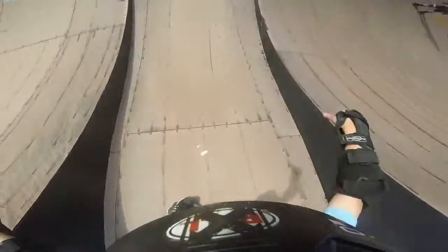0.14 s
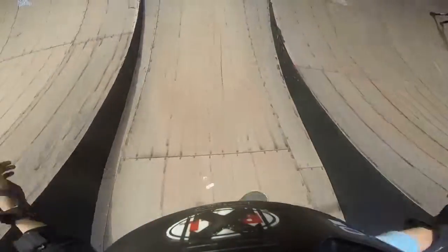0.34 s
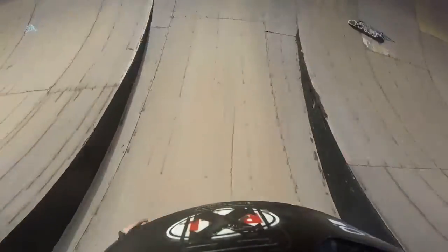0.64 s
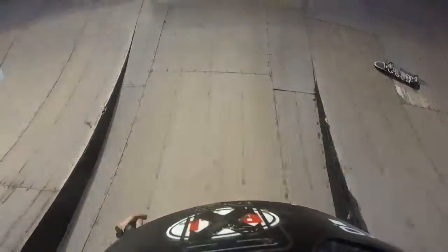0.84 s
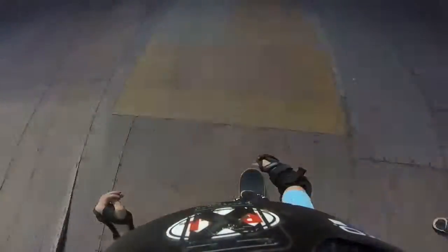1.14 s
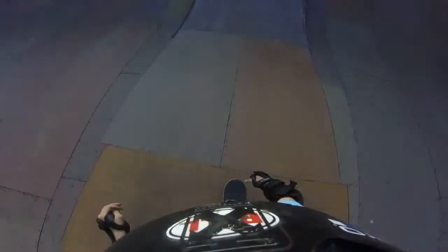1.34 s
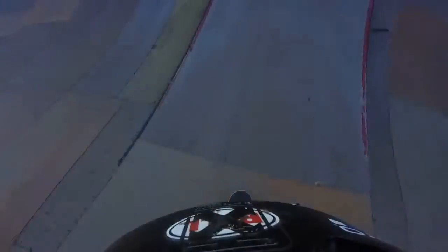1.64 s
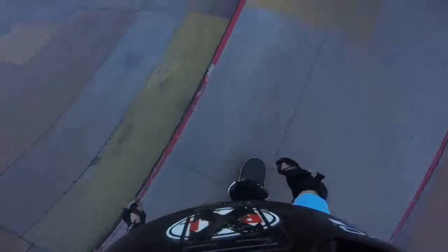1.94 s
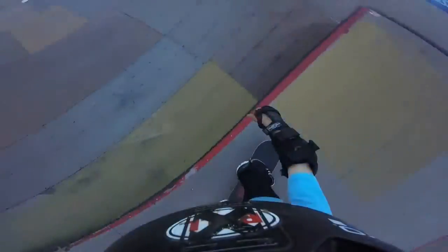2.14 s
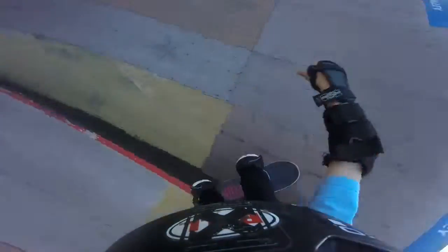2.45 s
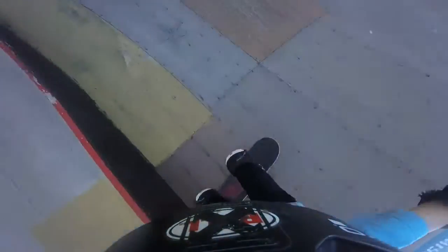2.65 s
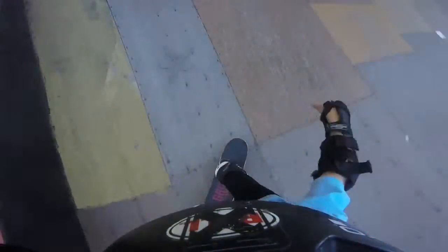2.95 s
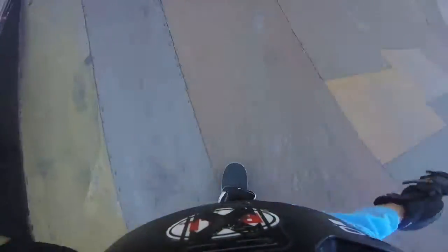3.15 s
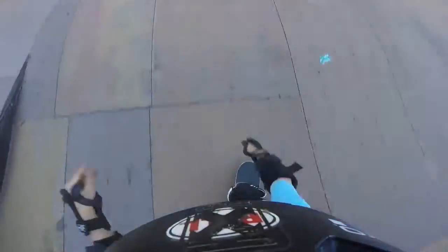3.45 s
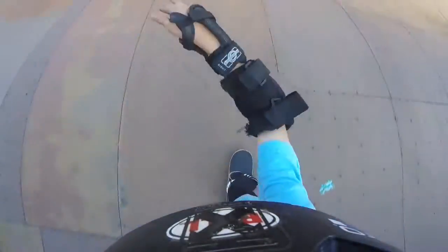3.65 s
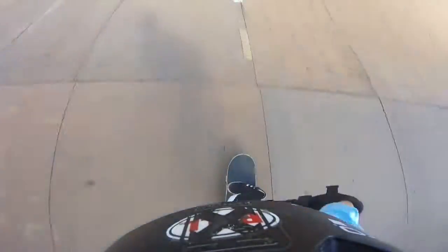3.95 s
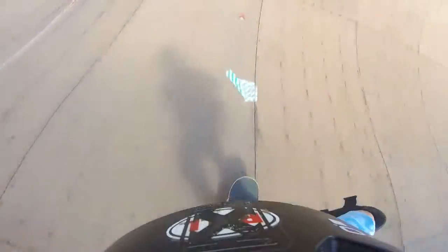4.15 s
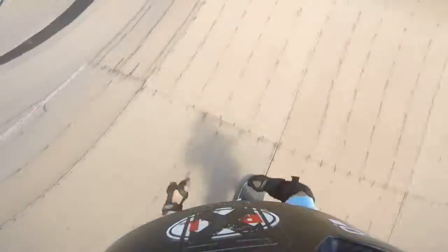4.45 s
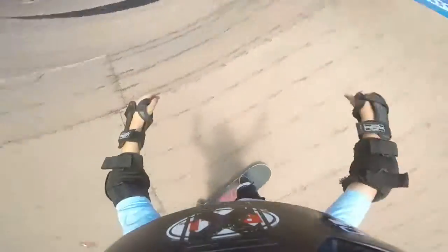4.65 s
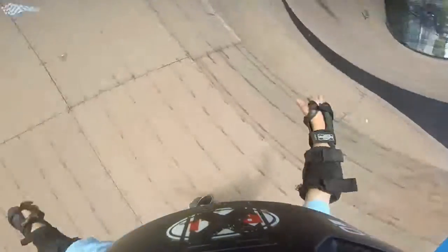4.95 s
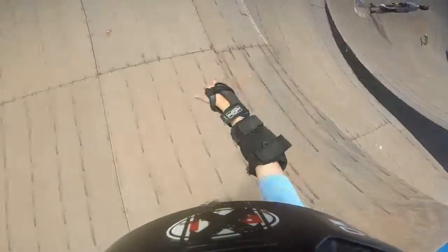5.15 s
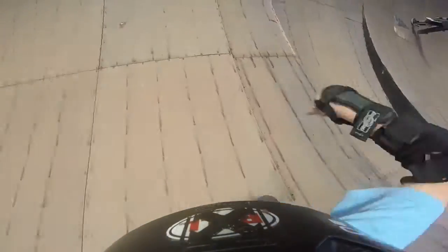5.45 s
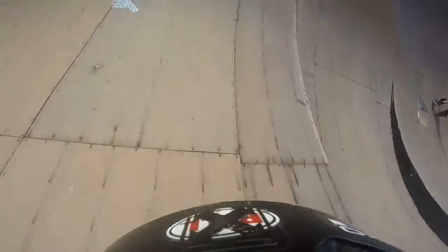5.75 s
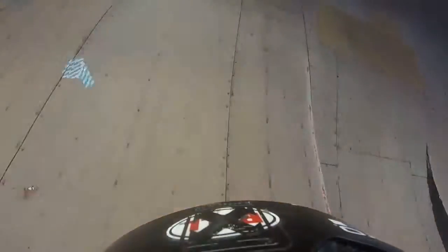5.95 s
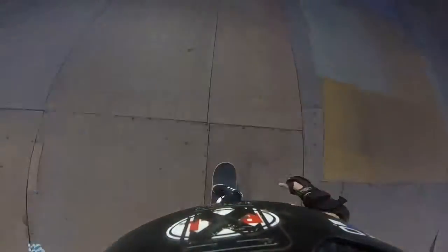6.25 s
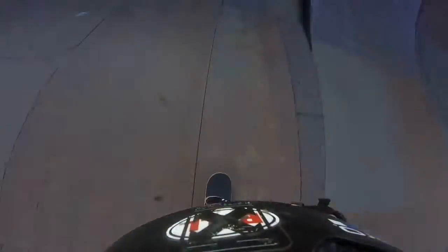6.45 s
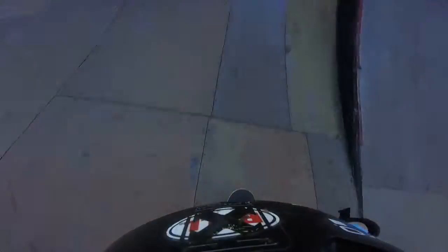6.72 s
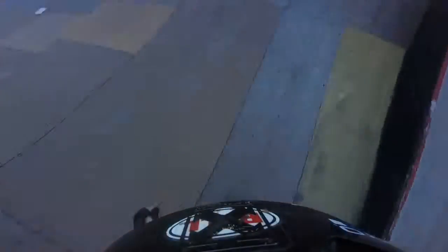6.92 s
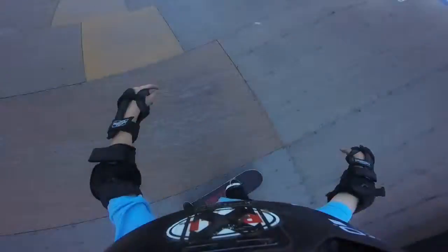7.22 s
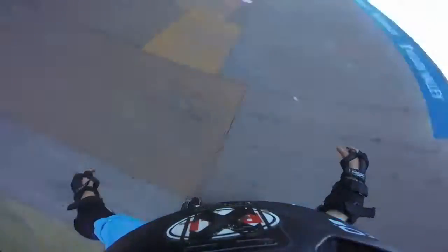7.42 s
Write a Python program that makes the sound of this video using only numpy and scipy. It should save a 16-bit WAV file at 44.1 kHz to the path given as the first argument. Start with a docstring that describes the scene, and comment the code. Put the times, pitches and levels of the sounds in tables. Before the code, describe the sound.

Skateboard wheels roll through a skatepark bowl with a hollow whir that swells and fades with speed. After a short chattering skid, the board clacks over seams, goes quieter in a brief jump and slams down with a thump and rattle. It rolls on with more clacks, eases off and builds again. The sound is close and slightly muffled, from a helmet microphone with low wind rumble.

```python
"""Skateboard wheels roar through a bowl: rough contact excites them, more loudly with speed and load.
They clack over seams, chatter in a stick-slip skid, spin free in a short air and slam down again.
The landing jolts the rider's helmet and air buffets it. All is heard from a closed plastic camera
case on the helmet, whose wall muffles the board and whose resonances ring with it."""
import sys
import numpy as np
from scipy import signal
from scipy.fft import rfft, irfft
from scipy.io import wavfile

SR = 44100
rng = np.random.default_rng(int(sys.argv[2]) if len(sys.argv) > 2 else 0)


def persist_wave(psi):
    """Save psi, clipped to +-1, as 16-bit WAV."""
    counts = np.round(np.clip(psi, -1, 1) * 32767).astype(np.int16)
    wavfile.write(sys.argv[1], SR, np.atleast_2d(counts).T)


N = 334278
T = np.arange(N) / SR
TAPS = 8192  # samples in one short sound and in a filter's transform
HZ = np.fft.rfftfreq(TAPS, 1 / SR)
CRUISE_TURNS_PER_S = 36
LIFT_S, LAND_S = 2.454, 2.946
# three carves, fast and heavy in the bowl, slow and light on its walls:
# (time [s], wheel speed [turns/s], load [0-1])
RIDE = [(0.0, 25.3, 0.5), (0.16, 12.2, 0.2), (0.44, 19.2, 0.12), (0.63, 26.7, 0.77), (1.14, 36.1, 0.98),
        (1.71, 32.8, 0.83), (1.94, 35.4, 0.98), (2.28, 32.8, 0.86), (2.77, 24.1, 0.14), (3.1, 29.2, 0.57),
        (3.49, 34.3, 0.95), (4.21, 39.3, 0.83), (4.68, 36, 0.86), (5.08, 24.4, 0.63), (5.21, 18.6, 0.32),
        (5.59, 19.3, 0.23), (5.76, 29.3, 0.6), (6.16, 32.9, 0.9), (6.51, 37.4, 0.78), (7.28, 34.3, 0.97),
        (7.58, 26.7, 0.69)]


def amp(db):
    """Amplitude ratio of a level in decibels."""
    return 10 ** (np.asarray(db) / 20)


def unit(x):
    """Normalisation to rms 1."""
    return x / np.sqrt(np.mean(x ** 2) + 1e-20)


def shape(points):
    """Spectral envelope in dB, interpolated over log frequency."""
    hz, db = np.transpose(points)
    return np.interp(np.log(HZ + 1), np.log(hz), db)


def bump(hz, width):
    """Gaussian band of height 1; width is taken at half height."""
    return .5 ** ((2 * (HZ - hz) / width) ** 2)


def resonance_db(hz, width):
    """Lorentzian peak of a single resonance."""
    return -20 * np.log10(1 + (2 * (HZ - hz) / width) ** 2)


def case_db():
    """Transmission through the case: its wall absorbs treble and its resonances lift narrow bands."""
    # transmission of the wall: (frequency [Hz], gain [dB])
    wall = [(30, -30.5), (200, -17), (900, -19), (1100, -20.5), (1850, -21), (2600, -21.5), (3300, -22.5),
            (3650, -31.5), (4400, -49), (7700, -50.5), (10000, -54.5), (15000, -77)]
    # resonances of the case: (frequency [Hz], width [Hz], lift [dB])
    case_modes = [(1389, 402, 21), (1154, 26, 5), (1266, 126, 4.5), (1383, 49, 4.5), (1544, 54, 7.5),
                  (1689, 45, 8), (2223, 470, 8.5), (3100, 560, 2.5), (4080, 390, 11.5), (5320, 390, 7),
                  (6490, 830, 9.5), (8350, 400, 5), (9260, 730, 7.5)]
    return shape(wall) + sum(db * bump(hz, width) for hz, width, db in case_modes)


def colour(x, db):
    """Minimum-phase filter: it is causal, so ringing follows the blow."""
    log_gain = np.log(amp(np.concatenate([db, db[-2:0:-1]])))
    response = np.fft.ifft(np.exp(signal.hilbert(log_gain).conj())).real
    return signal.fftconvolve(x, response[:TAPS // 2])[:len(x)]


def wobble(hz):
    """Random modulation: low-passed noise of rms 1."""
    f = np.fft.rfftfreq(N, 1 / SR)
    return unit(irfft(rfft(rng.standard_normal(N)) / (1 + (f / hz) ** 2), N))


def swell(t, peak_s):
    """Critically damped pulse that reaches 1 at peak_s."""
    return t / peak_s * np.exp(1 - t / peak_s)


def add(mix, s, sound):
    """Superposition of a sound starting at time s."""
    part = mix[round(s * SR):][:len(sound)]
    part += sound[:len(part)]


def speed(t):
    """Rotation rate of the wheels in turns per second."""
    s, turns, _ = np.transpose(RIDE)
    return np.maximum(np.interp(t, s, turns), 1)


def load(t):
    """Normal force of the rider's weight on the wheels, 0-1."""
    s, _, weight = np.transpose(RIDE)
    return np.clip(np.interp(t, s, weight), 0, 1)


def aloft(rise_s=.33, settle_s=.24):
    """Loss of contact: rises to 1 as the board leaves the lip and falls after the landing."""
    return np.clip(np.minimum(1 + (T - LIFT_S) / rise_s, 1 - (T - LAND_S) / settle_s), 0, 1)


def ride_gain(cruise_db, per_doubling_db, unloaded_db, aloft_db):
    """Power law of speed, with offsets in level as the weight comes off and the board flies."""
    doublings = np.log2(speed(T) / CRUISE_TURNS_PER_S)
    return amp(cruise_db + per_doubling_db * doublings + unloaded_db * (1 - load(T)) + aloft_db * aloft())


def tread(turns, size=1200):
    """Periodic excitation: the same worn tread meets the ground on every turn."""
    return np.interp(turns % 1, np.arange(size) / size, rng.standard_normal(size))


def reflection(x, delay_s, sweep_s, rate_hz, share):
    """Comb filtering: an echo with a changing path sweeps hollow bands through the sound."""
    return x + share * np.interp(T - delay_s - sweep_s * wobble(rate_hz), T, x)


def rolling(patchy_db=1.6, grain_db=3, grains_per_s=900, skitter_db=3, squash_turns_per_s=37.3):
    """Roughness excitation: uneven ground, loose grains and four treads shake the wheels and board."""
    # spectra of flattened wheels, light wheels, surface drone and grit: (frequency [Hz], level [dB])
    squashed_spectrum = [(200, -32.5), (700, -15), (1100, -1), (1300, -3), (1700, -5), (2000, -4),
                         (3000, -23), (8000, -47.5)]
    light_spectrum = [(200, -32), (900, -28.5), (1180, -13.5), (1380, -3.5), (1490, 0.5), (1580, -3),
                      (1750, 0.5), (2000, -10.5), (3000, -25.5), (8000, -40)]
    drone_spectrum = [(80, -9.5), (210, -12), (290, -12), (420, -2.5), (540, 1), (660, -1.5), (780, -11.5),
                      (1000, -14.5), (1300, -28.5), (3000, -51.5)]
    grit_spectrum = [(300, -19), (900, -2), (1400, -16.5), (1900, -5.5), (3200, -1.5), (4200, -1),
                     (5500, 0), (9300, -1.5), (15000, -10.5)]
    turns = np.cumsum(speed(T)) / SR
    ground = amp(patchy_db * wobble(hz=45.3))
    grains = rng.standard_normal(N) * amp(grain_db * np.minimum(rng.exponential(1, N), 4))
    grains *= rng.random(N) < grains_per_s / SR

    def voice(spectrum):
        """Source and filter: four slightly detuned wheels, echoed by the curved wall and the ground."""
        treads = unit(sum(tread(turns * (1 + .008 * slip)) for slip in rng.standard_normal(4)))
        contact = ground * (rng.standard_normal(N) + .31 * unit(grains) + .72 * treads)
        with_wall = reflection(contact, delay_s=.01, sweep_s=.0022, rate_hz=.842, share=.38)
        with_ground = reflection(with_wall, delay_s=.00239, sweep_s=.00035, rate_hz=1.18, share=.25)
        return unit(colour(with_ground, shape(spectrum) + case_db()))

    # a fast carve flattens the wheels and lowers their ring
    squash = np.minimum(speed(T) / squash_turns_per_s, 1) ** 5
    skitter = amp(skitter_db * (1 - load(T)) * wobble(hz=20))  # a light wheel keeps losing its grip
    wheels = np.sqrt(squash) * voice(squashed_spectrum)
    wheels += np.sqrt(1 - squash) * skitter * voice(light_spectrum)
    whirr = ride_gain(cruise_db=-35, per_doubling_db=17.5, unloaded_db=-1.2, aloft_db=-9)
    drone = ride_gain(cruise_db=-34, per_doubling_db=3, unloaded_db=-36.5, aloft_db=-3.5)
    grit = ride_gain(cruise_db=-43, per_doubling_db=20.5, unloaded_db=1, aloft_db=-.5)
    return whirr * wheels + drone * voice(drone_spectrum) + grit * voice(grit_spectrum)


def fizzing(flutter_db=.5):
    """Fine contact noise of the treads follows a steep power law of speed."""
    # fizz of the treads: (frequency [Hz], level [dB])
    fizz_spectrum = [(500, -41), (3000, -21.5), (5000, -8), (6500, 3), (9400, 5.5), (11000, -6),
                     (15000, -17)]
    contact = rng.standard_normal(N) * amp(flutter_db * wobble(hz=60))
    gain = ride_gain(cruise_db=-65.5, per_doubling_db=24, unloaded_db=-7.5, aloft_db=-1.5)
    return gain * unit(colour(contact, shape(fizz_spectrum) + case_db()))


def spinning(half_aloft_db=-48, lift_db=14, light_db=-55, loaded_db=-20, flutter_db=2):
    """Fluttering bearings excite the wheels' modes, faintly under a light board, clearly in the air."""
    # resonances of the free wheels and bearings: (frequency [Hz], width [Hz], level [dB])
    bearing_modes = [(1500, 280, -3), (1740, 240, 0), (2150, 250, -7), (2760, 330, 0), (3350, 200, -7),
                     (3830, 160, -7)]
    modes_db = 20 * np.log10(.03 + sum(amp(db) * bump(hz, width) for hz, width, db in bearing_modes))
    balls = rng.standard_normal(N) * amp(flutter_db * wobble(hz=40))
    free = aloft()
    in_air = (free > 0) * amp(half_aloft_db + lift_db * (free - .5))
    on_ground = amp(light_db + loaded_db * load(T))
    return np.maximum(in_air, on_ground) * unit(colour(balls, modes_db + case_db()))


def air(lumpy_db=3.5, hiss_db=-57):
    """Turbulence buffets the helmet, growing with speed and in gusts, over a quiet steady hiss."""
    # spectra of the buffeting and the background hiss: (frequency [Hz], level [dB])
    rumble_spectrum = [(10, -15.5), (25, 14.5), (45, -2), (70, -1), (100, 1.5), (140, -4), (185, -12.5),
                       (230, -12), (320, -20), (800, -63), (3000, -93)]
    hiss_spectrum = [(50, -2), (500, -5), (1000, -13), (1400, -14), (1900, -7.5), (3000, -15), (4400, -20),
                     (7000, -25.5), (10000, -32), (15000, -38.5)]
    # gusts at the helmet: (time [s], half length [s], lift [dB])
    gust_swells = [(1.92, 0.056, 5.5), (3.8, 0.071, 9), (4.6, 0.35, 4), (6.7, 0.93, 3.5)]
    buffeting = rng.standard_normal(N) * amp(lumpy_db * wobble(hz=28))
    lumps = unit(colour(buffeting, shape(rumble_spectrum)))
    hiss = unit(colour(rng.standard_normal(N), shape(hiss_spectrum)))
    gusts = amp(sum(db * np.exp(-((T - s) / half) ** 2) for s, half, db in gust_swells))
    gain = ride_gain(cruise_db=-34.5, per_doubling_db=8.5, unloaded_db=-7, aloft_db=-5)
    return gain * gusts * lumps + amp(hiss_db) * hiss


def clinks(decay_s=.0072, width_hz=260):
    """Loose metal in the unloaded trucks briefly excites one narrow resonance."""
    # clinks of the trucks: (time [s], level [dB], frequency [Hz])
    truck_clinks = [(.055, -40.5, 2250), (.209, -43, 2150), (5.134, -38.5, 2110), (5.246, -37, 2106)]
    out, t = np.zeros(N), np.arange(TAPS) / SR
    for s, db, hz in truck_clinks:
        ring = colour(rng.standard_normal(TAPS) * np.exp(-t / decay_s), resonance_db(hz, width_hz))
        add(out, s, amp(db) * ring / abs(ring).max())
    return out


def blows(full_load_pits_per_s=2.5, pit_db=-31, pit_knock_db=-3, pit_edge_db=-4, candidates=80):
    """Impacts on the wheels: single bumps, each seam once per axle, and random pits under load."""
    # bumps, the landing and its rebounds: (time [s], level [dB], deck knock [dB], sharp edge [dB])
    single_blows = [(.204, -33, -6, -1), (.36, -26.5, -35, -7), (.699, -23.5, -10, -14),
                    (1.964, -25, 6, -13), (2.156, -22, -8, 2.5), (2.546, -23, -12, -8),
                    (2.949, -9.5, 6.5, 1), (2.953, -7.5, -2, 4), (2.963, -6, -14, 2), (2.976, -10.5, -1, 0),
                    (2.986, -9.5, -5, -4), (2.993, -17, 1.5, -24), (3.031, -13, -4, -16),
                    (3.088, -19.5, -3, -14), (4.228, -17, -21, -30), (4.348, -21.5, -2, 3),
                    (4.49, -20, -10, -6), (5.07, -28, -26, -12), (5.502, -27.5, -12, -3),
                    (5.801, -19, -9, 5), (6.216, -18.5, -7, -6.5), (6.496, -17, -18, -11)]
    # seams: (time [s], rear axle lag [s], front level [dB], rear level [dB], deck knock [dB],
    # sharp edge [dB])
    seams = [(1.392, 0.055, -26, -21, -20, -4), (1.553, 0.062, -15, -16, -13, -9),
             (1.871, 0.05, -22, -18.5, 3.5, -4), (3.257, 0.037, -18, -20, -20, -6),
             (3.715, 0.06, -16, -18, -2.5, -2), (4.155, 0.068, -18, -15.5, -3.5, -5.5),
             (4.292, .056, -15, -19.5, -8, -1.5), (4.409, .051, -19.5, -17.5, -7, -4),
             (4.529, 0.071, -22.5, -21, -4, -1), (6.029, 0.067, -11, -15, -9, -1)]
    yield from single_blows
    for s, lag, front_db, rear_db, deck_db, edge_db in seams:
        yield s, front_db, deck_db, edge_db
        yield s + lag, rear_db, deck_db - .7, edge_db
    for place, chance in rng.random(size=(candidates, 2)):
        s = place * T[-1]
        if chance < full_load_pits_per_s * T[-1] / candidates * load(s) ** 4:
            yield s, pit_db, pit_knock_db, pit_edge_db


def rattle_decay(s, db, tight_s=.0052, loose_s=.002, usual_db=-19.5, halving_db=22):
    """Damping time in seconds: an unloaded board rattles longer, a harder blow is over sooner."""
    return (tight_s + loose_s * (1 - load(s))) * 2 ** ((usual_db - db) / halving_db)


def clacks(ring_hz=1410, thud_hz=580, rise_s=.00077, tail_db=-27, tail_s=.053, crack_db=-34):
    """Impact response: a wheel cracks and rings, trucks rattle, the deck knocks, the bowl adds a tail."""
    out, t, case = np.zeros(N), np.arange(TAPS) / SR, case_db()
    treble = np.clip(np.log2((HZ + 1) / 1800), 0, 1)
    crack_band = 20 * np.log10(.001 + bump(hz=6500, width=8000))
    onset = 1 - np.exp(-t / rise_s)  # soft wheels take a moment to compress
    tail = amp(tail_db) * np.exp(-t / tail_s)
    for s, db, deck_db, edge_db in blows():
        force = rng.standard_normal(TAPS) * onset * (np.exp(-t / rattle_decay(s, db)) + tail)
        deck = 20 * np.log10(1 + amp(deck_db + 14) * bump(hz=540, width=360))
        rattle = colour(force, case + deck + (edge_db + 5) * treble)
        ring = swell(t, peak_s=.0011) * np.sin(2 * np.pi * ring_hz * rng.uniform(.93, 1.064) * t)
        thud = amp(deck_db - 6) * swell(t, peak_s=.0015) * np.sin(2 * np.pi * thud_hz * t)
        sharpness = amp(crack_db + edge_db) * (speed(s) / CRUISE_TURNS_PER_S) ** 2
        crack = sharpness * colour(rng.standard_normal(TAPS) * swell(t, peak_s=.001), crack_band)
        add(out, s, amp(db) * (crack + thud + .6 * ring + .63 * rattle / abs(rattle).max()))
    return out


def skid(start_s=.602, length_s=.069, slips_per_s=122, jitter_s=.00117, squeak_hz=1500,
         first_db=-20.5, last_db=-19, uneven_db=3.5):
    """Stick-slip friction: the wheels catch and let go unevenly, each slip a squeak and a scrape."""
    out, t = np.zeros(N), np.arange(TAPS) / SR
    scrape_colour = case_db() + 2.2 * np.log2(1 + HZ / squeak_hz)
    for since in np.arange(0, length_s, 1 / slips_per_s):
        late, stronger = rng.standard_normal(2)
        db = first_db + (last_db - first_db) * since / length_s + uneven_db * stronger
        squeak = swell(t, peak_s=.0023) * np.sin(2 * np.pi * squeak_hz * rng.uniform(.9, 1.04) * t)
        scrape = colour(rng.standard_normal(TAPS) * swell(t, peak_s=.003), scrape_colour)
        slip = .88 * squeak + .399 * scrape / abs(scrape).max()
        add(out, start_s + since + jitter_s * late, amp(db) * slip)
    return out


def squeal(hz=1540, width_hz=130):
    """Friction from sideways creep drives one narrow wheel resonance where the rider steers hard."""
    # swells of creep: (peak time [s], level [dB], rise [s], fall [s])
    creeps = [(.636, -32, .06, 0.035), (5.07, -41.5, .11, 0.061), (5.83, -40, 0.069, 0.21)]
    envelope = sum(amp(db) * np.exp(np.minimum((T - s) / rise, (s - T) / fall))
                   for s, db, rise, fall in creeps)
    return envelope * unit(colour(rng.standard_normal(N), resonance_db(hz, width_hz)))


def ticks(decay_s=.0021, width_hz=3600, focus_db=15, thin_db=34):
    """Tiny impacts of grit and gear radiate bright snaps with almost no bass."""
    # snaps of grit and gear: (time [s], level [dB], band centre [Hz])
    snaps = [(.688, -44, 5893), (.793, -34, 5700), (.855, -44, 5592), (0.923, -39, 5840),
             (2.099, -35.5, 4440), (3.717, -29.5, 4292), (4.434, -35, 4503), (4.489, -33.5, 4660),
             (4.601, -43, 6995), (4.657, -39, 5700), (5.283, -42.5, 4387), (5.723, -31, 4302)]
    out, t, case = np.zeros(N), np.arange(TAPS) / SR, case_db()
    for s, db, hz in snaps:
        spectrum = case + focus_db * bump(hz, width_hz) + thin_db * np.minimum(HZ / hz, 1)
        snap = colour(rng.standard_normal(TAPS) * np.exp(-t / decay_s), spectrum)
        add(out, s, amp(db) * snap / abs(snap).max())
    return out


def jolts(decay_cycles=.61, chatter_db=-15, chatter_s=.0028, hard_hz=100):
    """Damped oscillation: the mount swings and the helmet shell booms; quick jolts add chatter."""
    # jolts of the helmet mount: (time [s], level [dB], frequency [Hz])
    mount_jolts = [(1.518, -15.5, 85.5), (2.994, -2.5, 104.9), (3.031, -5, 103), (3.041, -14, 45.5),
                   (3.061, -9.5, 34), (3.091, -10, 95), (3.105, -12, 56.5), (3.26, -16.5, 81),
                   (3.737, -19, 54.4), (4.026, -15, 76.74), (5.733, -26, 71), (7.533, -21.5, 89.2)]
    # modes of the helmet shell: (frequency [Hz], level [dB], decay [s])
    shell_modes = [(133.6, -24, 0.035), (173, -23.5, 0.0083), (224.6, -23.5, 0.022)]
    out, t = np.zeros(N), np.arange(TAPS) / SR
    boom = sum(amp(db) * np.sin(2 * np.pi * hz * t) * np.exp(-t / decay) for hz, db, decay in shell_modes)
    chatter_band = 20 * np.log10(.0012 + bump(hz=2200, width=950))
    for s, db, hz in mount_jolts:
        swing = np.sin(2 * np.pi * hz * t) * np.exp(-t * hz / decay_cycles) + boom
        chatter = colour(rng.standard_normal(TAPS) * np.exp(-t / chatter_s), chatter_band)
        hardness = amp(chatter_db) * (hz / hard_hz) ** 2
        add(out, s, amp(db) * (hardness * chatter / abs(chatter).max() - swing / abs(swing).max()))
    return out


def clatter(level_db=-26, decay_s=.08, uneven_db=5.5):
    """The landing sets trucks and deck chattering; damping makes it die away exponentially."""
    # shaken trucks and deck: (frequency [Hz], level [dB])
    clatter_spectrum = [(300, -7), (600, 1), (1400, -14.5), (1800, 1.5), (2700, -4), (3400, -11),
                        (9000, -15), (15000, -15)]
    since = np.maximum(T - LAND_S, 0)
    envelope = amp(level_db) * (T > LAND_S) * np.exp(-since / decay_s)
    shaking = rng.standard_normal(N) * amp(uneven_db * wobble(hz=90))
    return envelope * unit(colour(shaking, shape(clatter_spectrum) + case_db()))


def scene():
    """Superposition of the board, the air at the helmet and the impacts in one channel."""
    running = rolling() + fizzing() + spinning() + air()
    return (running + clatter() + squeal() + jolts() + ticks() + clinks() + skid() + clacks())[None]


def record(dry, low_hz=6, high_hz=15200):
    """Band limiting by the camera: a gentle high-pass and a steep low-pass."""
    passed = signal.sosfilt(signal.butter(1, low_hz, "highpass", fs=SR, output="sos"), dry)
    lowpass = signal.firwin(511, high_hz, window=("kaiser", 9), fs=SR)
    return signal.oaconvolve(passed, lowpass[None], "same")


dry = scene()
out = record(dry)
persist_wave(out)
```